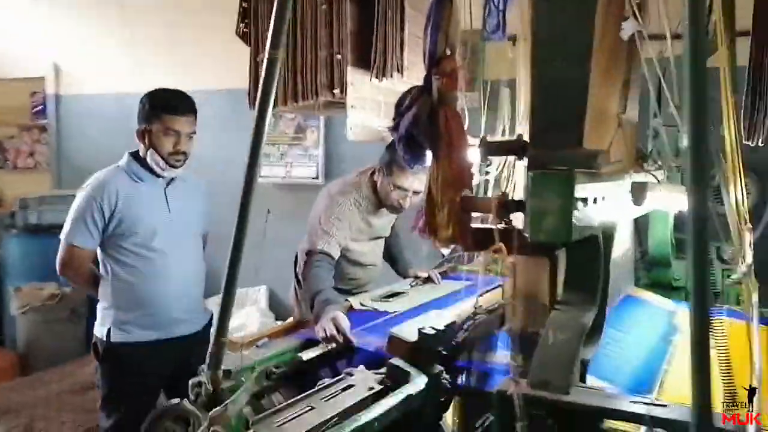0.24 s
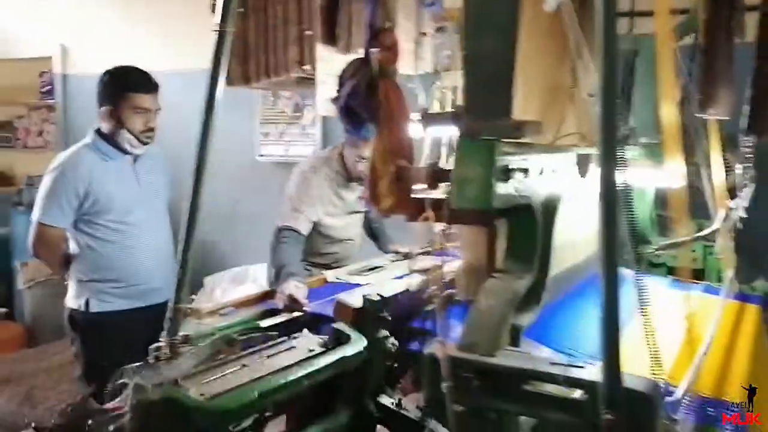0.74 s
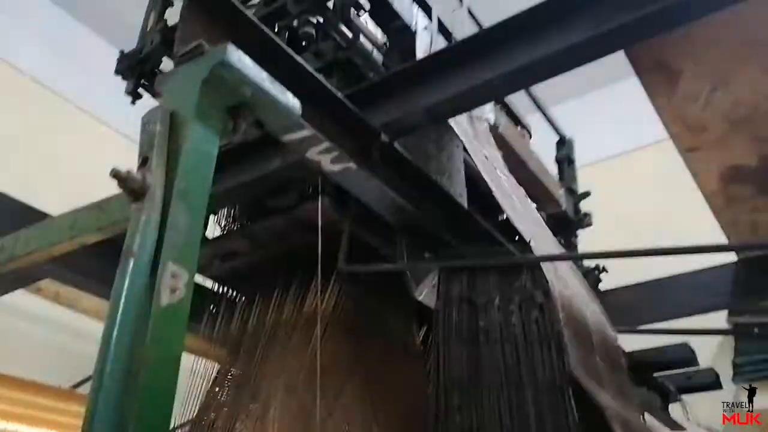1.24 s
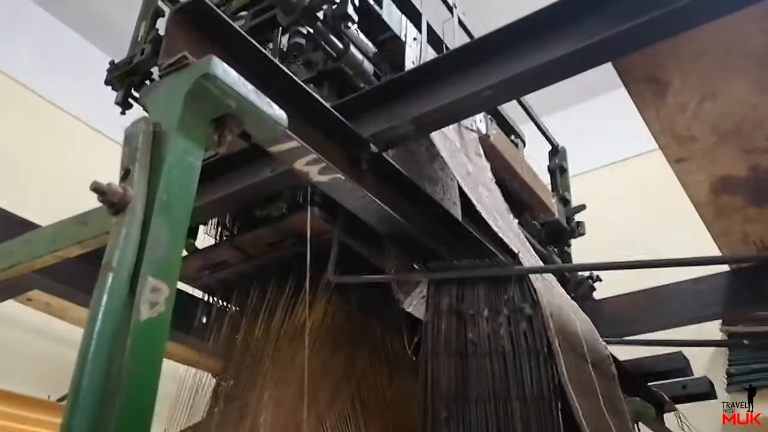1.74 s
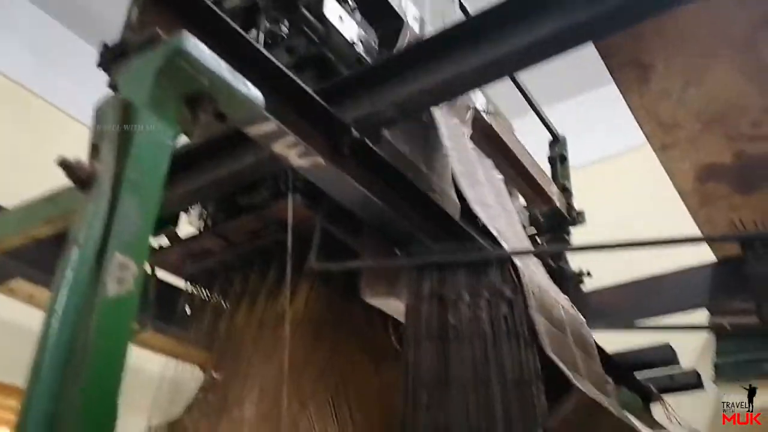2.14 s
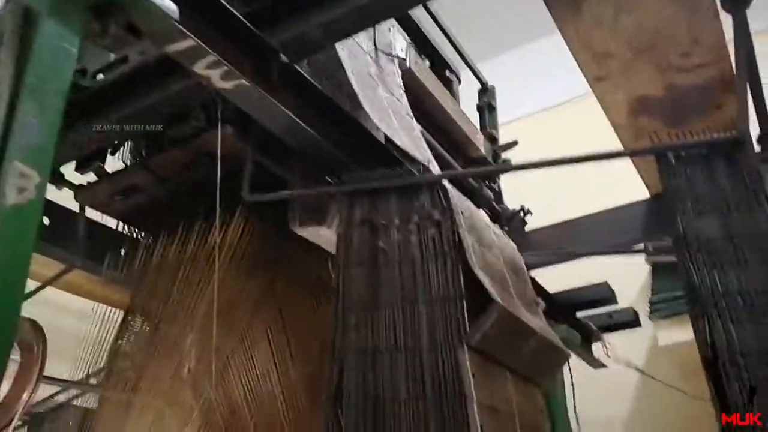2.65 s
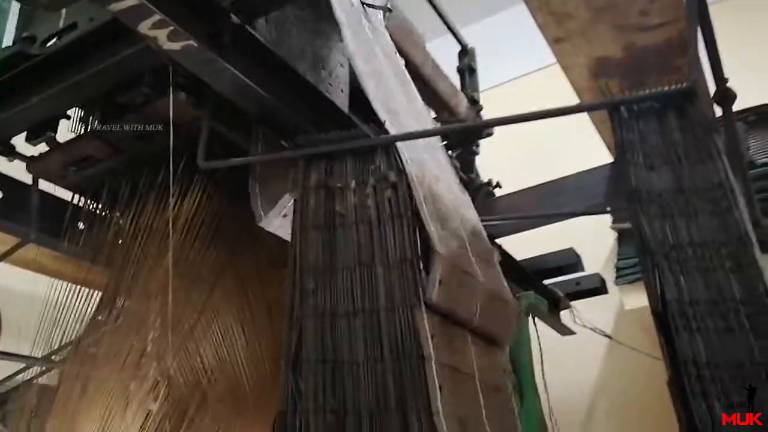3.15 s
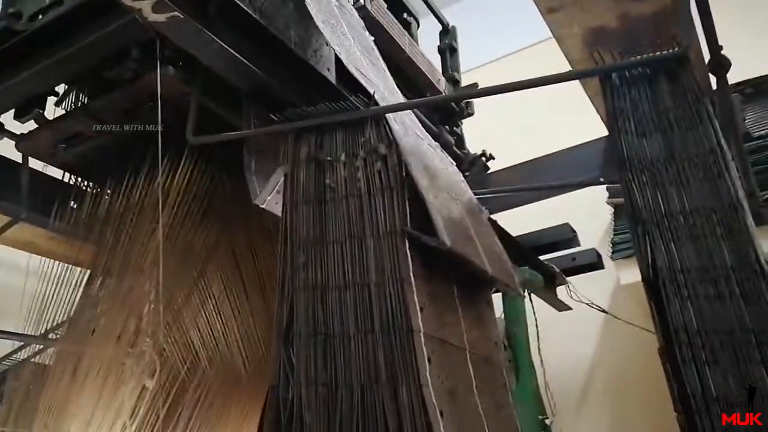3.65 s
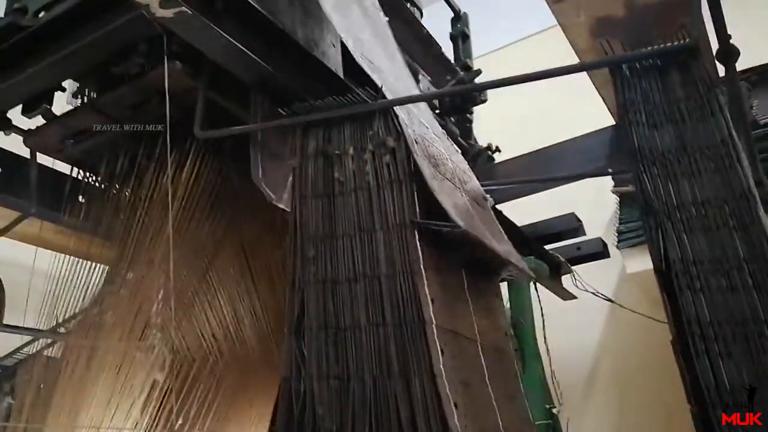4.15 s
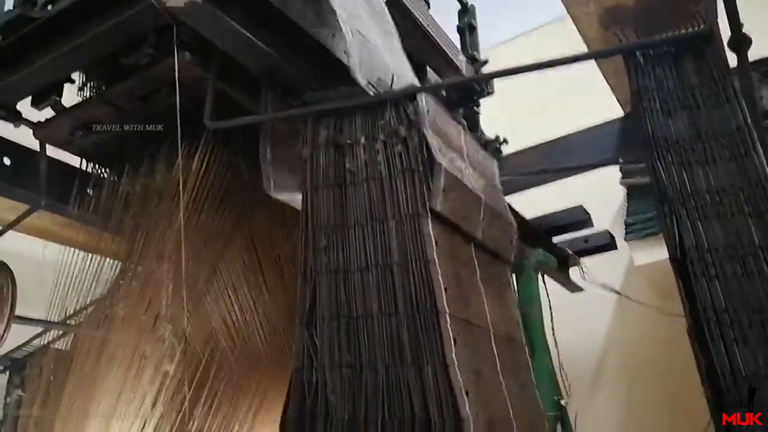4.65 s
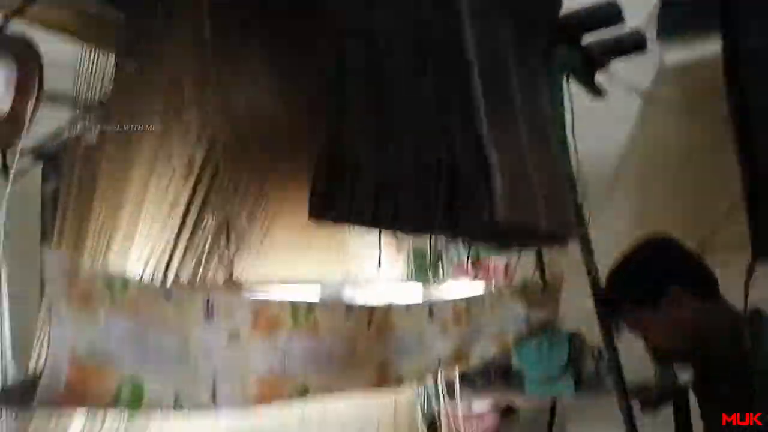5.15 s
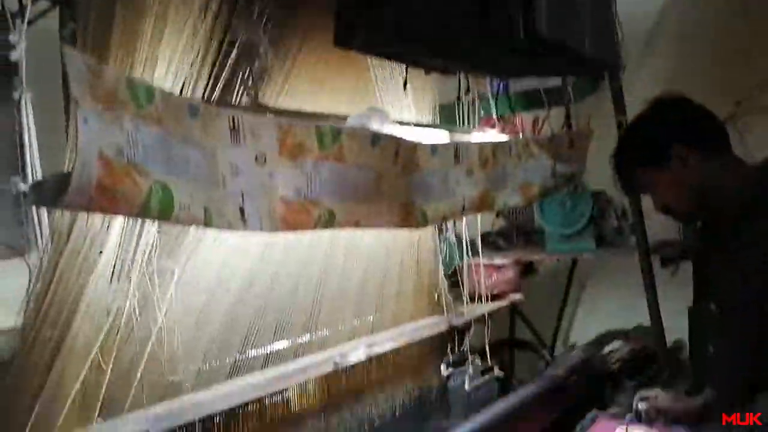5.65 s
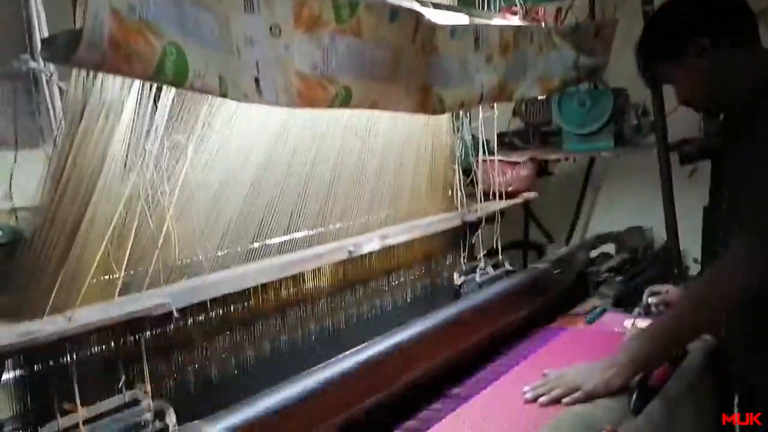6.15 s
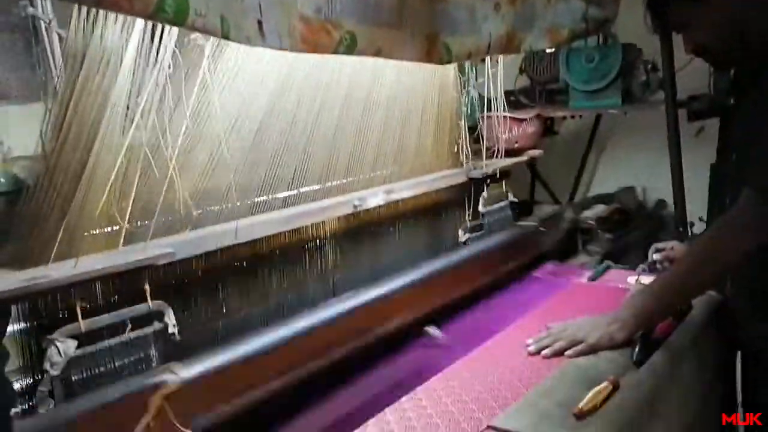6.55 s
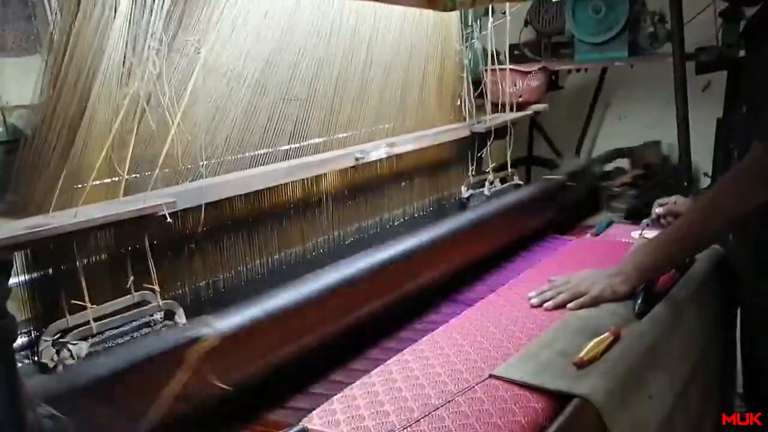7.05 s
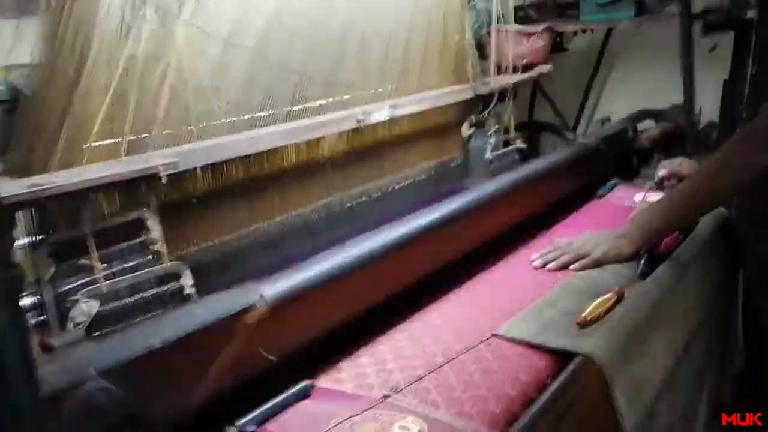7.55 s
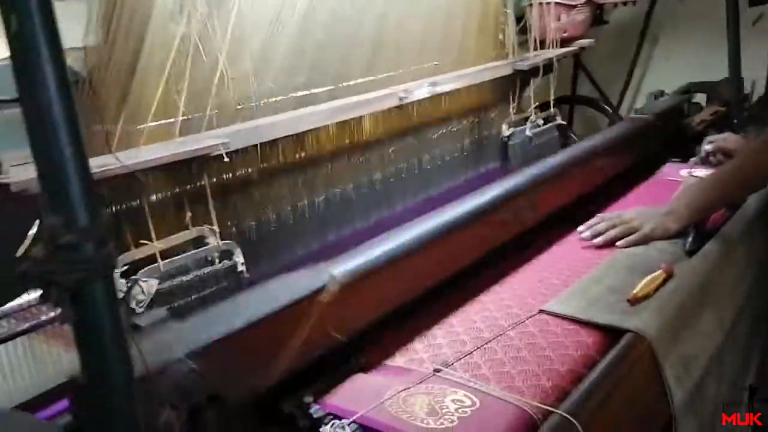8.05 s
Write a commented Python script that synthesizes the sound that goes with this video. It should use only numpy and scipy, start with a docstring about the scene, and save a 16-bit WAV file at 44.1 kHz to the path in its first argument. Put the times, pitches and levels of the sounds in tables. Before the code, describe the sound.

Power looms clatter loudly in a weaving shed, break off briefly, then return with sharper rhythmic knocks, steel cracks and rattling.

```python
"""Power looms clatter in a hard-walled weaving shed, their parts striking on every turn of the crank.
They are heard from two places, with a short silence between. First one loom stands out: its iron
frame clangs and its motor drones. Then four near looms beat against each other over many more.
Wooden knocks and steel cracks sit on top. The two microphone ports (small openings) ring, the
microphone is bumped, a hand shifts over the right port, and the loudest blows overload it."""
import sys
import numpy as np
from scipy import signal
from scipy.fft import rfft, irfft, next_fast_len
from scipy.io import wavfile

SR = 44100
rng = np.random.default_rng(int(sys.argv[2]) if len(sys.argv) > 2 else 0)


def wrap_up_sound(samples):
    """Save the sound to the file named by the first command line argument, as 16-bit audio."""
    columns = np.atleast_2d(samples).T
    # keep every value between -1 and 1, then stretch to whole-number steps
    tamed = np.clip(columns, -1, 1)
    steps = np.round(tamed * 32767).astype(np.int16)
    wavfile.write(sys.argv[1], SR, steps)


N = 366023
TIME = np.arange(N) / SR
FFT_SIZE = next_fast_len(N + SR)
FREQ = np.maximum(np.arange(FFT_SIZE // 2 + 1) * SR / FFT_SIZE, 1)

# When each of the two places is heard: start_s, end_s
PLACE_TIMES = [(0, 1.043), (1.405, 8.4)]
# Tone of the looms, from bass to treble: pitch_hz, first_place_db, second_place_db
LOOM_TONE = [(30.0, -16, -15.5), (55.0, -7, -15), (75.7, -2.5, -7), (138, -7, -7.5), (250.0, -11.5, -8.5),
             (450.0, -6.5, -5), (1267, -5.5, -3), (1600, -9, -7.5), (2004, -5, -5.5), (5200, -17, -6.5),
             (10280, -22.5, -14), (14000, -30.5, -22), (14940, -33.5, -17.5)]
# How near the looms sound as the microphone is carried about. Frames and swinging beams knock,
# shuttles and levers clatter, thread guides and needles rattle: time_s, knock_db, clatter_db, rattle_db
FIRST_LEVELS = [(0, -25.5, -27, -25.5), (.15, -24.5, -30, -24.5), (.3, -26, -30.5, -27),
                (.37, -25, -26.5, -24.5), (.52, -25.5, -29.5, -24.5), (.59, -28, -25.5, -25),
                (.78, -27, -31, -30), (.9, -28.5, -27.5, -26), (1.04, -27, -31, -29.5)]
SECOND_LEVELS = [(1.45, -22, -20.5, -19.5), (1.7, -23, -21, -20), (2.2, -23.5, -20, -19),
                 (2.35, -24, -22.5, -23.5), (2.65, -24.5, -21.5, -19.5), (3.1, -24, -22.5, -22),
                 (3.9, -23, -22, -21.5), (4.8, -25, -21.5, -21.5), (5.3, -22.5, -22.5, -22),
                 (5.7, -22, -23, -22), (7.0, -23.5, -21.5, -22.5), (8.3, -22, -23, -23)]
# One turn of the crank for each of the four near looms: loom, turn_s
CRANK_TURN_S = {"fastest": .4571, "fast": .5708, "slow": .6262, "slowest": .6435}
# Their strokes, with levels relative to the din. A fade is always the time taken to fall by 60 dB.
# loom, into_turn_s, knock_db, clatter_db, rattle_db, fade_s
NEAR_STROKES = [("fastest", .015, -3, -12, -21, 1.0), ("fastest", .146, -4, -5, -13, 0.65),
                ("fastest", .276, -22, -1, -1, 0.18), ("fastest", .387, -22, -8, -1.8, 0.49),
                ("fast", .056, -22, -2.2, -2, 0.31), ("fast", .324, -22, -1.7, -4, .57),
                ("fast", .376, -1, 1, 0, 0.67), ("fast", .486, -6, -5, -21, 0.71),
                ("slow", 0.025, -8, -5, -5.5, 1.0), ("slow", 0.052, -2, -2, -12, 0.94),
                ("slow", 0.114, -16, -1.6, -12, 1.0), ("slow", .178, -4.5, -2.5, -13, 1.0),
                ("slow", .309, -5, -2, -4, 0.26), ("slow", .332, -22, -1, -1, 0.41),
                ("slow", 0.67, -22, -10, -7, 1.0), ("slowest", 0.135, -22, -12, -3.5, .97),
                ("slowest", .203, -22, -2, 0, 0.55), ("slowest", .234, -15, 0, -4, 0.35),
                ("slowest", .327, -1, 0, 1, 0.17), ("slowest", .456, -22, -3, 0, .32),
                ("slowest", 0.5, -14, -1, 0, .12), ("slowest", .605, -14, -2.5, -13, 1.0)]
# Single hard blows, some falling on the fast loom's steel crack, with relative levels: start_s, wood_db,
# steel_db, fade_s
HARD_BLOWS = [(0.032, -14, -28, 0.34), (.111, -14.5, -19, 0.14), (.344, -12, -21.5, .28),
              (.483, -16, -30, 0.17), (.553, -11, -6, 0.039), (.801, -15, -22, 0.053),
              (.852, -13, -12, 0.21), (1.44, -23, -6, 0.048), (1.489, -21, -9, .15), (1.604, -23, -10, .11),
              (1.773, -17, -8, 0.089), (1.905, -13, -22, 0.16), (2.003, -10, -22, 0.084),
              (2.22, -15, -18, .15), (2.608, -17, -13, .25), (2.783, -13, -20, .25), (3.023, -17, -11, .22),
              (3.134, -19, -16, .08), (3.19, -14, -26, .35), (3.481, -21, -10, 0.074),
              (3.68, -22, -15, .15), (3.97, -9.5, -28, 0.2), (4.054, -26, -10.5, 0.2),
              (4.182, -29, -13.5, .15), (4.363, -14, -27, .12), (4.385, -16, -14, .2),
              (4.501, -14, -16, .25), (4.744, -12, -20, .06), (4.894, -15, -12, 0.04),
              (4.944, -21, -14, 0.099), (5.052, -17, -15, 0.29), (5.376, -18, -17, .15),
              (5.51, -13, -27, .2), (5.6, -19, -15, .15), (5.705, -12, -25, .25), (5.762, -16, -9, 0.084),
              (5.98, -26, -16, .05), (6.095, -13, -26, .15), (6.315, -12, -28, 0.16),
              (6.351, -26, -8.5, .06), (6.593, -14, -14.5, .18), (6.759, -18, -17, 0.12),
              (6.949, -13, -20, .15), (7.03, -11, -24, .15), (7.112, -14, -23, .25), (7.226, -17, -15, .2),
              (7.397, -18, -20, .16), (7.51, -19, -14, 0.12), (7.82, -11.5, -28, 0.35),
              (7.955, -14, -26, 0.22), (8.055, -10, -6.5, .07), (8.18, -26, -16, .12),
              (8.24, -11.5, -26, .2)]
# Ringing notes of the iron frame: pitch_hz, width_hz, level_db, fade_s
FRAME_NOTES = [(1175, 110, -17.5, 0.7), (1835, 99, -21, 0.95), (2570, 110, -28.5, 0.9)]
# Notes of the first loom's motor: pitch_hz, relative_db
MOTOR_NOTES = [(70, 0), (94, -1), (119, -1), (178, -3)]
# How alike left and right are in the shed (1 is the same, 0 is unrelated): pitch_hz, likeness
STEREO_LIKENESS = [(60, 0.87), (130, 0.91), (290, 0.91), (640, 0.59), (1000, 0.38), (1400, -0.23),
                   (3000, 0.0046)]
# Dull bumps against the microphone: start_s, level_db, pitch_hz, fade_s
MIC_BUMPS = [(.553, -29.5, 44.9, .12), (7.2247, -11, 105, .022)]
# The microphone turns among the looms (a positive lean favours the left): time_s, lean, treble_db
MIC_TURNS = [(0, .8, -2.5), (1.8, 0, 0), (2.2, -5, 3), (2.75, -5.5, 1), (3.25, -3, .7), (4.75, -2.5, 1),
             (5.75, -1, 1), (8.2, -0.3, .7)]
# Peaks and dips of the left port and of the right one, open or cupped: pitch_hz, width_hz, gain_db
LEFT_PEAKS = [(3040, 570, 2), (3990, 690, -7), (5450, 550.0, 3), (8610, 1180, 11.0), (9960, 740, 4.5)]
RIGHT_OPEN_PEAKS = [(1910, 2550, 4), (3040, 1740, 10.5), (4140, 1000, -9), (6130, 1920, 11.5),
                    (6950, 1230, 10.5), (14560, 1500, 15)]
RIGHT_CUPPED_PEAKS = [(1615, 1850, 5.5), (2780, 1470, 7.5), (2780, 550, 1.5), (3810, 770, -12.5),
                      (5340, 1330, 15.5), (12680, 4800, 8)]
# A hand over the right port (0 is open, 1 is cupped): time_s, cupped_share
HAND_COVER = [(2.55, 0.26), (2.9, 0.62), (3.2, 0.88), (4.5, 0.95)]


def looms(crack_fade_s, ring_fade_s, ring_db, spread_db, wash_db, count=8, size=8192):
    """Looms run at unrelated speeds, a dozen parts striking in each; the shed blurs far ones to a wash."""
    hits = np.zeros((2, N + size))
    fades = [from_db(-60 * TIME[:size] / fade_s) for fade_s in (crack_fade_s, ring_fade_s)]
    for turn_s in np.repeat(rng.uniform(.45, .68, count), 12):
        crack, ring = struck_part(*fades)
        sound = crack + from_db(ring_db) * ring
        for at, strength in strikes(turn_s, spread_db):
            hits[:, at:at + size] += strength * sound
    wash = from_db(wash_db) * rng.standard_normal((2, N))
    return rms_one(hits[:, :N]) + wash


def struck_part(crack_fade, ring_fade, note_count=130):
    """A struck iron or steel part gives a short crack and rings at many scattered pitches."""
    size = len(crack_fade)
    notes = np.zeros((2, size // 2 + 1))
    notes[:, rng.integers(1, size // 2, note_count)] = rng.standard_normal((2, note_count))
    crack = rng.standard_normal((2, size)) * crack_fade
    ring = irfft(notes, size) * ring_fade
    return rms_one(crack), rms_one(ring)


def strikes(turn_s, spread_db, slack_s=.003):
    """A slightly loose part strikes at the same point of each turn. Gives pairs of sample, strength."""
    turns = np.arange(-1, 30)
    times = (turns + rng.random()) * turn_s + slack_s * rng.standard_normal(len(turns))
    strength = from_db(2 * spread_db * (rng.random() + rng.random(len(turns))))
    heard = (times > 0) & (times < TIME[-1])
    return zip((times[heard] * SR).astype(int), strength[heard])


def near_loom_beat(rise_s=0.0035):
    """Each stroke comes once a turn and dies away in the shed. Gives gains for knock, clatter, rattle."""
    power = np.ones((3, N))
    for loom, into_turn_s, knock_db, clatter_db, rattle_db, fade_s in NEAR_STROKES:
        age_s = (TIME - into_turn_s) % CRANK_TURN_S[loom]
        pulse = np.minimum(age_s / rise_s, 1) * from_db(-60 * age_s / fade_s) ** 2
        power += from_db([[knock_db], [clatter_db], [rattle_db]]) ** 2 * pulse
    return np.sqrt(power)


def loom_din(levels, tone_db, parts, beat=(1, 1, 1)):
    """Heavy parts knock low down, medium ones clatter in the middle and light ones rattle up high."""
    bands = below(1930), above(1767) * below(3850), above(3700)
    return sum(from_db(level_db) * gain * spread_in_shed(part, from_db(tone_db) * band)
               for level_db, gain, part, band in zip(over_time(levels), beat, parts, bands))


def hard_blows(knock_db, crack_db, echo_db, echo_fade_s, chatter_s):
    """Wood knocks and steel cracks: the parts chatter for a moment, die quickly and leave an echo."""
    knock_power, crack_power = np.zeros((2, N))
    age_s = TIME[:SR // 2]
    for start_s, wood_db, steel_db, fade_s in HARD_BLOWS:
        at = round(start_s * SR)
        direct = from_db(-60 * np.maximum(age_s - chatter_s, 0) / fade_s) ** 2
        filling = fade_s / echo_fade_s   # a longer blow fills the shed more
        echo = filling * from_db(echo_db - 60 * age_s / echo_fade_s) ** 2
        power = (direct + echo)[:N - at]
        knock_power[at:at + len(power)] += from_db(wood_db + knock_db) ** 2 * power
        crack_power[at:at + len(power)] += from_db(steel_db + crack_db) ** 2 * power
    # Tone of each material: pitch_hz, relative_db
    wood_tone = [(100, -17.5), (450, -1.5), (1150, -3.5), (3000, -1.5), (5000, -9.5), (15000, -35.5)]
    steel_tone = [(1000, -38), (3000, -7.0), (5000, 1.5), (8000, 0.5), (11000, -4), (15000, -11.0)]
    wood = noise(from_db(over_pitch(wood_tone)[0]))
    steel = noise(from_db(over_pitch(steel_tone)[0]))
    return np.sqrt(knock_power) * wood + np.sqrt(crack_power) * steel


def frame_clang(start_s=.031):
    """The iron frame is struck once and rings in clusters of close notes."""
    return sum(from_db(level_db) * dying(start_s, fade_s) * noise(around(pitch_hz, width_hz))
               for pitch_hz, width_hz, level_db, fade_s in FRAME_NOTES)


def motor_drone(level_db=-42.5, width_hz=6):
    """The first loom's motor and belt drone on a few low, unsteady notes."""
    tone = sum(from_db(db) * around(pitch_hz, width_hz) for pitch_hz, db in MOTOR_NOTES)
    return from_db(level_db) * rms_one(filtered(rng.standard_normal(N), tone))


def mic_bumps():
    """A bump makes the microphone swing a few times, slowly and the same on both sides."""
    return sum(-from_db(db) * dying(start_s, fade_s) * np.sin(2 * np.pi * pitch_hz * (TIME - start_s))
               for start_s, db, pitch_hz, fade_s in MIC_BUMPS)


def mic_port(sound, peaks):
    """The small hollow in front of a microphone boosts some pitches and weakens others."""
    for pitch_hz, width_hz, gain_db in peaks:
        gain = from_db(gain_db / 2)
        damping = np.tan(np.pi * width_hz / SR)
        tuning = -2 * np.cos(2 * np.pi * pitch_hz / SR)
        forward = [1 + damping * gain, tuning, 1 - damping * gain]
        feedback = [1 + damping / gain, tuning, 1 - damping / gain]
        sound = signal.lfilter(forward, feedback, sound)
    return sound


def spread_in_shed(pair, tone):
    """Two unrelated signals become a left and a right with the given tone, alike in the bass."""
    alike = np.clip(over_pitch(STEREO_LIKENESS)[0], -1, 1)
    middle, side = filtered(pair, tone * np.sqrt([1 + alike, 1 - alike]))
    return rms_one(np.array([middle + side, middle - side]))


def noise(tone):
    """Stereo noise with the given tone."""
    return spread_in_shed(rng.standard_normal((2, N)), tone)


def from_db(db):
    """Turn decibels into a gain to multiply by."""
    return np.exp(np.asarray(db) * (np.log(10) / 20))


def rms_one(sound):
    """Scale a sound so that its average level (rms) is 1."""
    return sound / np.sqrt(np.mean(sound ** 2) + 1e-20)


def over_time(rows):
    """Fill in each column of a table for every sample."""
    time_s, *columns = np.transpose(rows)
    return [np.interp(TIME, time_s, column) for column in columns]


def over_pitch(rows):
    """Fill in each column of a table for every frequency."""
    pitch_hz, *columns = np.transpose(rows)
    return [np.interp(np.log(FREQ), np.log(pitch_hz), column) for column in columns]


def filtered(sound, gain):
    """Give each frequency of a sound its own gain."""
    return irfft(rfft(sound, FFT_SIZE) * gain, FFT_SIZE)[..., :N]


def above(hz):
    """Gains that keep what lies above a pitch."""
    return 1 / np.sqrt(1 + (hz / FREQ) ** 12)


def below(hz):
    """Gains that keep what lies below a pitch."""
    return 1 / np.sqrt(1 + (FREQ / hz) ** 12)


def around(hz, width_hz):
    """Gains that keep what lies close to a pitch."""
    return 1 / (1 + (2 * (FREQ - hz) / width_hz) ** 2)


def dying(start_s, fade_s):
    """A level that jumps to 1 and then fades."""
    return (TIME >= start_s) * from_db(-60 * np.clip((TIME - start_s) / fade_s, 0, 2))


def scene():
    """The looms at one place and then the other, with blows, the clang and bumps on top."""
    heavy = looms(crack_fade_s=0.089, ring_fade_s=0.15, ring_db=-2.0, spread_db=2.5, wash_db=3.0)
    medium = looms(crack_fade_s=0.039, ring_fade_s=0.18, ring_db=4.5, spread_db=3.5, wash_db=-0.5)
    light = looms(crack_fade_s=0.011, ring_fade_s=0.21, ring_db=8.5, spread_db=3.5, wash_db=0.0)
    parts = heavy, medium, light
    first_tone, second_tone = over_pitch(LOOM_TONE)
    first = loom_din(FIRST_LEVELS, first_tone, parts)
    second = loom_din(SECOND_LEVELS, second_tone, parts, near_loom_beat())
    blows = hard_blows(knock_db=-7.0, crack_db=-6.0, echo_db=-3, echo_fade_s=0.92, chatter_s=.004)
    second_start_s = PLACE_TIMES[1][0]
    din = np.where(TIME < second_start_s, first + motor_drone(), second)
    return din + blows + frame_clang() + mic_bumps()


def record(dry, ceiling=1.0, fade_s=0.018, cutoff_hz=15500):
    """The microphone turns, its ports ring, loud blows overload it and the highest treble is lost."""
    lean, treble_db = over_time(MIC_TURNS)
    treble_change = (from_db(treble_db) - 1) * filtered(dry, above(9000))
    left, right = (dry + treble_change) * from_db([lean * 0.76, -lean * 0.21])
    cupped = np.clip(over_time(HAND_COVER)[0], 0, 1)
    right_open = mic_port(right, RIGHT_OPEN_PEAKS)
    right_cupped = mic_port(right, RIGHT_CUPPED_PEAKS)
    sound = np.array([mic_port(left, LEFT_PEAKS), (1 - cupped) * right_open + cupped * right_cupped])
    sound = sound / (1 + (sound / ceiling) ** 8) ** (1 / 8)   # overload rounds off the peaks
    # Silence falls between the two places.
    heard = sum((TIME >= start_s) * from_db(-60 * np.clip((TIME - end_s) / fade_s, 0, 2))
                for start_s, end_s in PLACE_TIMES)
    treble_cut = np.clip((cutoff_hz - FREQ) / 400 + .5, 0, 1)
    return filtered(sound * heard, treble_cut)


dry = scene()
out = record(dry)
wrap_up_sound(out)
```